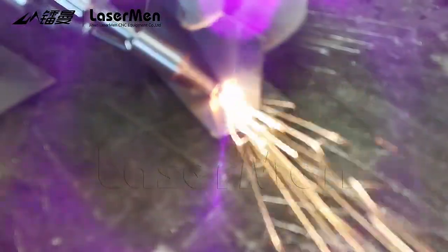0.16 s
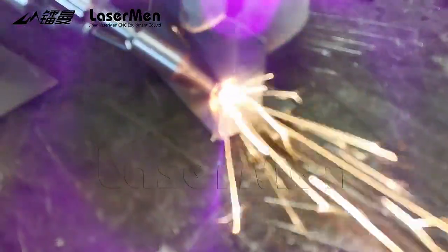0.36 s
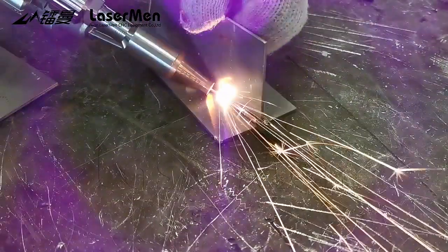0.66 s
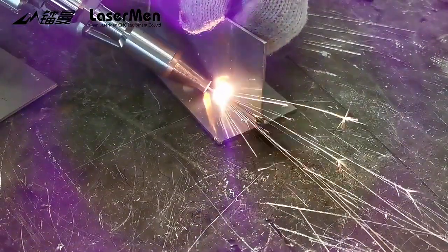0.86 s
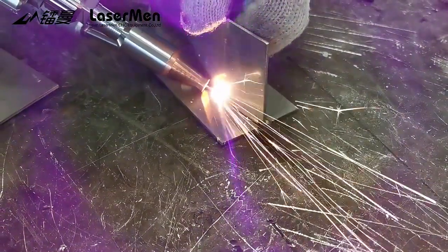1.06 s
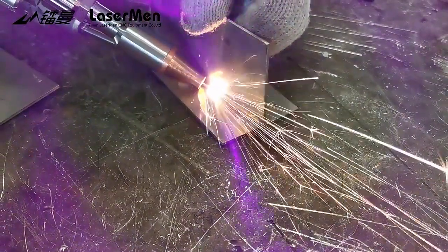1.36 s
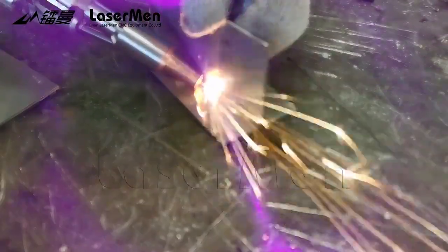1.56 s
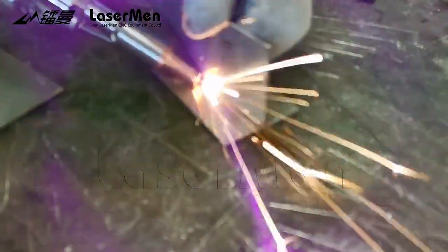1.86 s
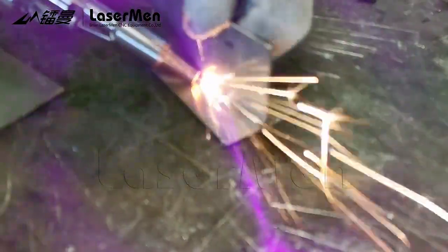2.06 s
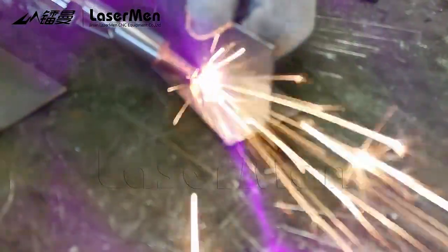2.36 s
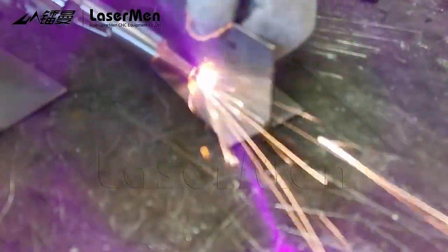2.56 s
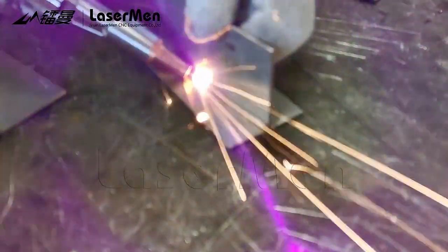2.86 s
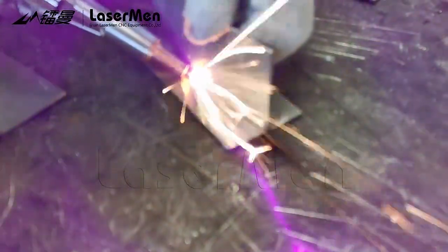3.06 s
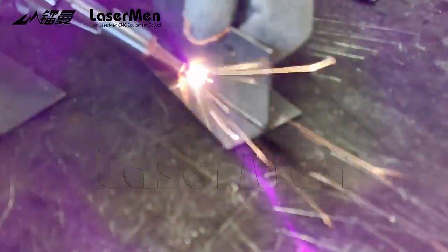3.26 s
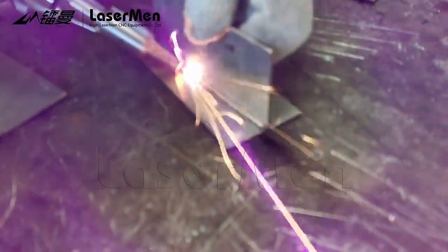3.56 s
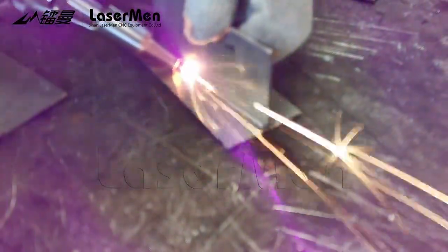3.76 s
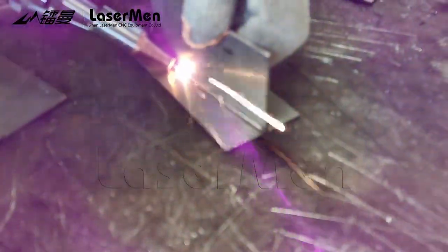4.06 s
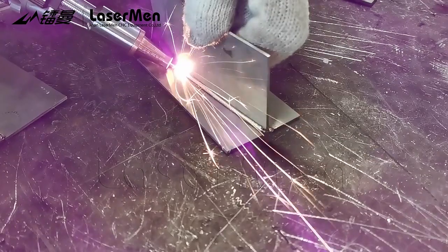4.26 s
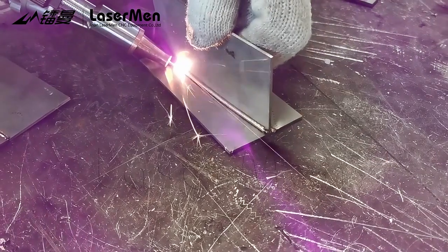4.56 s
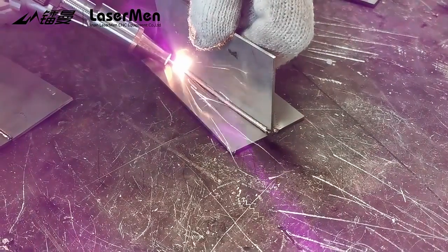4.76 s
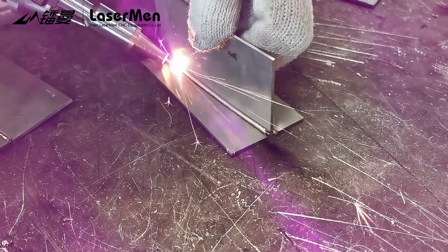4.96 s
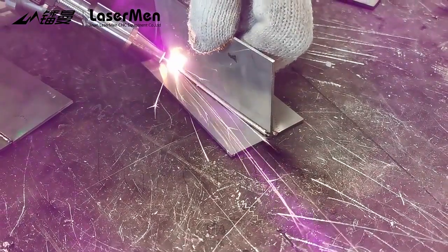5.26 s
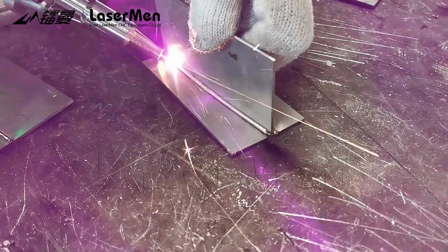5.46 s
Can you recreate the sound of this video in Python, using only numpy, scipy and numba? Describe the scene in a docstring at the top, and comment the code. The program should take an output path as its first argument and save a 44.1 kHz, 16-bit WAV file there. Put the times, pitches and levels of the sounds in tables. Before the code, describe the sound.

A steady, bright gas hiss with a thin high whistle and a fluttering low hum, as a handheld laser welder draws a seam on steel.

```python
"""A handheld laser welder draws a seam along a steel corner joint, close to a phone with two far-apart microphones.
From the start, filtered noise makes gas hiss, a corner roar and two whistles; sine waves make the beam's hum.
Behind them lie a noise rumble and a motor drone. Dull puffs come with some hum swells between 0.2 and 3.2 s.
At the right, the high whistle jumps up at 1.3 s, sinks near 3.7 s and returns; the low one ends higher.
The roar comes and goes throughout, and the deep rumble swells near 3.4 s and again near 5.4 s."""
import sys
import numpy as np
from scipy import signal
from scipy.fft import rfft, irfft
from scipy.io import wavfile
from scipy.ndimage import uniform_filter1d
from numba import njit

SR = 44100
rng = np.random.default_rng(int(sys.argv[2]) if len(sys.argv) > 2 else 0)


def materialize(psi):
    """Save the field psi as 16-bit PCM at rate SR to the path in sys.argv[1].

    A 1-D psi becomes a single channel; in a 2-D psi each row is a channel.
    """
    bounded = np.clip(np.atleast_2d(psi).T, -1, 1)
    quanta = np.round(bounded * 32767).astype(np.int16)
    wavfile.write(sys.argv[1], SR, quanta)


N = 248283  # samples, about 5.63 s

# Levels are relative wherever a whole layer is set to one strength afterwards.
# paths by which the left turbulence also reaches the right microphone, off plate and bench;
# a negative lag reaches the right first: (lag/ms, sway/ms, sway f/Hz)
ECHO_PATHS = [(-3.4, .5, .43), (-1.1, .4, .61), (.9, .45, .37), (2.6, .5, .53)]
# colour of the workshop fans and machines: (f/Hz, left relative level/dB, right relative level/dB)
SHOP_COLOUR = [(14, -2, -6), (32, -9, -1), (58, 5, 0), (76.6, -1, -2), (92, 3, -0.5), (106, -2.5, -3),
               (131, -1.5, -3), (237, 1, -5), (350, -4, -6.5), (470, -3.5, -15), (680, -2.5, -0.5),
               (870, -1, -8), (1030, -5, -6.5), (1240, -4.5, -4.5), (1380, -3, -4), (1857, -1, 1.5),
               (2180, -32, -23)]
# rise and fall of the deep rumble: (t/s, relative level/dB)
DEEP_RUMBLE_LEVEL = [(0.0, -2), (0.6, -1.5), (1.25, -1), (1.7, -5), (2.4, -2), (3.4, 5), (3.8, -2.5),
                     (4.6, 0.5), (5.2, -1), (5.4, 7), (5.63, -6)]
# brief dull puffs: (middle t/s, spread t/s, centre f/Hz, level/dB before the left-right balance)
PUFFS = [(0.182, 0.034, 400, -54), (0.4, 0.024, 180, -59), (1.48, 0.02, 497, -58), (2.52, 0.041, 348, -58),
         (3.23, 0.042, 350, -56)]
# beam hum between swells, before its wavering:
# (t/s, left level/dB of multiples 2, 3, 4, right level/dB of multiples 2, 3, 4)
HUM_LEVEL = [(0.0, -67, -63.5, -63, -63, -65, -72), (0.45, -70.5, -68, -61.5, -66, -71, -65),
             (0.8, -69, -65, -62.5, -68, -70, -75), (1.2, -63, -68, -74, -69, -80, -80),
             (1.6, -69.5, -74, -66, -76, -78, -68), (2.2, -59.5, -70, -77, -69, -73, -82),
             (2.9, -59.5, -72, -61.5, -72, -69, -86), (3.5, -69, -61.5, -76, -68, -69, -74),
             (4.1, -57.5, -68, -76, -64, -62, -77), (4.2, -62, -50, -72, -62, -57.5, -64),
             (5.0, -61, -61.5, -73, -71, -59.5, -76), (5.63, -58.5, -61, -76, -63, -63, -66)]
# brief swells of the hum: (middle t/s, spread t/s, peak change of level/dB at the left for multiples 2, 3, 4)
HUM_SWELLS = [(0.18, 0.075, 11, 14.5, -7), (0.43, 0.044, 17, -6, 3), (0.91, 0.018, -2, 4, 15),
              (1.5, 0.1, 8, 10, 4), (1.98, 0.023, 9, -3, -6), (2.52, 0.073, 4, 12, 3),
              (3.0, 0.037, 9, -7, 6), (3.25, 0.043, 13.5, 18.5, 7), (3.72, 0.03, 7, 13, -2),
              (4.17, 0.019, 3, 9, 15), (4.8, 0.037, 3, 8, -2), (5.12, 0.057, 11, 2, 12),
              (5.38, 0.024, -4, 10.5, 0)]
# weaker multiples of the wobble: (multiple, left level/dB, right level/dB, change of level/dB per s)
WEAK_MULTIPLES = [(1, -74, -81, -1), (5, -73, -82, -2), (6, -77, -78, -3), (7, -77, -72, -1),
                  (9, -84, -79, 0), (10, -80, -77, -1), (13, -82, -78, -1)]
# the two whistles: (left f/Hz, left level/dB, core width f/Hz, skirt width f/Hz,
# left skirt level/dB against the core, right skirt level/dB against the core)
WHISTLE_FORM = [(3785, -47.5, 90, 570, 3.5, -13), (6820, -45, 115, 660, 2, -6.5)]
# whistle pitch at the right, as the nozzle moves along the joint: (t/s, low whistle f/Hz, high whistle f/Hz)
RIGHT_PITCH = [(0.0, 3755, 6785), (1.26, 3745, 6790), (1.3, 3745, 6850), (2.45, 3760, 6880),
               (2.65, 3770, 6930), (3.7, 3795, 6945), (4.05, 3800, 6900), (4.6, 3815, 6920),
               (5.63, 3825, 6940)]
# whistles at the right: (t/s, low whistle level/dB, high whistle level/dB, level/dB of the shoulder below it)
RIGHT_LEVEL = [(0.0, -43.5, -38, -38.5), (0.7, -45, -35.5, -40), (1.24, -41.5, -39.5, -41.5),
               (1.3, -44, -34.5, -43), (1.45, -42, -36, -43), (2.45, -40.5, -36, -58),
               (2.65, -40.5, -40, -55), (3.7, -42, -45.5, -59), (4.05, -41.5, -39, -44),
               (4.6, -42.5, -36.5, -50), (5.63, -46, -39, -47)]
# resonances of the roar: (middle f/Hz, width f/Hz, relative level/dB, climb f/Hz per s)
ROAR_BANDS = [(1497, 93, -5, -9), (1604, 65, 0.5, 0.5), (1694, 48, -4, -17), (1830, 110, -2.5, -2)]
# strength of the roar in the corner of the joint: (t/s, level/dB)
ROAR_STRENGTH = [(0.0, -51), (0.3, -58.5), (0.7, -51.5), (1.2, -56.5), (1.98, -60.5), (2.08, -55),
                 (2.65, -56), (2.8, -50.5), (3.12, -60), (3.42, -52), (3.75, -63), (4.0, -50), (4.5, -61),
                 (4.65, -52.5), (5.05, -60), (5.3, -65), (5.63, -60)]
# colour of the broad jet noise: (f/Hz, left relative level/dB, right relative level/dB)
JET_COLOUR = [(1943, -15.5, -14.5), (2650, -6, -8), (3200, -6, -6), (4340, -0.5, 1), (4700, -1.5, -2),
              (5170, -1.5, 0.5), (6450, -2.5, -1), (7460, -3.5, 4), (7500, -1, -4), (7750, -2, 0),
              (8000, -5.5, -1), (8350, 1.5, -6), (9900, 1.5, -1), (11300, 2.5, -7.5), (12600, -2.5, -4),
              (13500, 2, 3), (14700, -4.5, -10), (16500, 6, -5)]
# nozzle and microphone-port resonances in the hiss, creeping as the nozzle moves: (middle f/Hz, width f/Hz,
# left relative level/dB, right relative level/dB, climb f/Hz per s, change of level/dB per s)
HISS_RINGS = [(2125, 190, -22.5, -28, 3, 0.5), (2360, 200, -28.5, -34, 9, -0.5),
              (2730, 180, -26.5, -25, -12, 0), (2928, 170, -34, -18, 22, 0.8),
              (3305, 240, -26.5, -18, -16, 2), (3516, 140, -31, -19, 0, -1.5),
              (4003, 110, -36, -19.5, 13, -1.8), (4794, 370, -16, -21, -7, 0),
              (5460, 740, -11.5, -17.5, 34, 0.1), (7100, 270, -30, -8.5, 31, -2),
              (8170, 280, -33, -29, 3, -7), (8700, 450, -3.5, -23, -12, -0.5), (8880, 500, 0, -19, 4, 0.5),
              (9510, 640, -1.5, -22, 13, -0.4), (10440, 1200, -10.5, -16, -2, 1.2),
              (10900, 450, -12, -19, -8, -2), (11560, 650, -16, -15, -2, 0.5),
              (11750, 1100, -8, -9, -4, -0.9), (12200, 410, -24, -18, -2, 2),
              (15400, 800, -20, -25, -2, -1)]

WOBBLE_HZ = 98.6  # rate of the beam wobble
TURBULENCE_SHARED, FLICKER_SHARED = .5, .6  # power in common, 0 to 1
DEEP_ALIKE, DEEP_ALIKE_HZ = .14, 397  # power in common at both microphones, below this pitch
RIGHT_SWING = .12  # share of each hum swell, in dB, heard at the right
FLUTTER_DB, FLUTTER_RAD, FLUTTER_PER_S = 3.4, .4, 45  # quick changes of the hum in level and phase
WHISTLE_FLAT, ROAR_FLAT = .85, .8  # how far apart the two filter stages are tuned, in widths
GAS_DB, JET_DB = -36.5, -1  # the whole hiss, and the jet within it


def undb(db):
    """Turn decibels into a plain multiplier."""
    return 10 ** (np.asarray(db) / 20)


def unit(x):
    """Scale a sound to an average strength (RMS) of 1."""
    return x / np.sqrt(np.mean(x ** 2))


def played(table):
    """Draw each column of a curve table over time, one value a sample."""
    s, *columns = np.transpose(table)
    return [np.interp(np.arange(N) / SR, s, column) for column in columns]


def drift(per_s):
    """A steady change, zero at the middle of the seam."""
    return per_s * (np.arange(N) - N / 2) / SR


def split(x, hz):
    """Part a sound into what lies below and above a pitch."""
    low = signal.filtfilt(*signal.butter(2, hz, fs=SR), x)
    return low, x - low


def walk(rate):
    """Random levels, held 1 / rate seconds and smoothed twice; their RMS is 1."""
    hold = int(SR / rate)
    steps = np.repeat(rng.standard_normal(N // hold + 1), hold)
    smooth = uniform_filter1d(uniform_filter1d(steps, hold), hold)
    return unit(smooth[:N])


def flicker(db, rate):
    """Quick random loudness changes at both microphones, partly the same."""
    both = np.sqrt(FLICKER_SHARED) * walk(rate)
    walks = np.array([both + np.sqrt(1 - FLICKER_SHARED) * walk(rate) for _ in range(2)])
    # the slow part is taken out: the tables play the slow swells
    slow = uniform_filter1d(walks, int(6 * SR / rate))
    return undb(db * unit(walks - slow))


def turbulence():
    """Two noises; the right one is partly the left one, by paths that drift as the hand moves."""
    left, own = rng.standard_normal((2, N))
    n = np.arange(N)
    echo = 0
    for lag_ms, sway_ms, sway_hz in ECHO_PATHS:
        delay_ms = lag_ms + sway_ms * np.sin(2 * np.pi * sway_hz * n / SR)
        echo = echo + np.interp(n - SR / 1000 * delay_ms, n, left)
    right = np.sqrt(1 - TURBULENCE_SHARED) * own + np.sqrt(TURBULENCE_SHARED) * unit(echo)
    return np.array([left, right])


@njit
def svf(x, hz, width):
    """Resonance that passes a band (state-variable filter); its centre may move every sample."""
    y, band, low = np.empty(len(x)), 0., 0.
    for i in range(len(x)):
        g, damping = np.tan(np.pi * hz[i] / SR), width / hz[i]
        v = (band + g * (x[i] - low)) / (1 + g * (g + damping))
        band, low, y[i] = 2 * v - band, low + 2 * g * v, damping * v
    return y


def ring(hz, width, flicker_db, rate, flat=0):
    """Turbulence rings a cavity: two filter stages in a row, tuned apart to flatten the top."""
    centres, width = hz * np.ones((2, N)), float(width)
    offset = flat * width / 2
    tones = []
    for noise, centre in zip(turbulence(), centres):
        first = svf(noise, centre - offset, width)
        tones.append(unit(svf(first, centre + offset, width)))
    return flicker(flicker_db, rate) * tones


def bands(noise, table, flicker_db, rate):
    """Two-channel noise coloured by a table; each quarter-octave band flickers alone."""
    hz, *colour = np.transpose(table)
    log_f = np.log2(np.maximum(np.fft.rfftfreq(N, 1 / SR), 1))
    curves = [np.interp(log_f, np.log2(hz), c, left=-99, right=-99) for c in colour]
    spectrum = rfft(noise) * undb(curves)
    out = 0
    for centre in np.arange(np.log2(hz[0]), np.log2(hz[-1]) + 1 / 4, 1 / 4):
        share = np.clip(1 - 4 * abs(log_f - centre), 0, 1)  # neighbouring bands overlap
        out = out + irfft(spectrum * share, N) * flicker(flicker_db, rate)
    return unit(out)


def shop():
    """Fans and machines: coloured noise and a motor drone; only the bass is partly alike on both sides."""
    deep, high = split(rng.standard_normal((3, N)), DEEP_ALIKE_HZ)
    noise = high[:2] + np.sqrt(1 - DEEP_ALIKE) * deep[:2] + np.sqrt(DEEP_ALIKE) * deep[2]
    deep, mid = split(bands(noise, SHOP_COLOUR, 2.67, 16), 120)
    # the middle of the rumble recedes by 0.48 dB per s
    rumble = deep * undb(played(DEEP_RUMBLE_LEVEL)) + mid * undb(drift(-.48))
    motor = np.sin(2 * np.pi * 59.8 * np.arange(N) / SR)
    drone = undb([[-82], [-72]]) * flicker(4.5, 9) * motor
    return undb(-53) * rumble + drone


def surges():
    """Short puffs of dull noise, shaped by a broad resonance and mostly on the left."""
    out, t = 0, np.arange(N) / SR
    for s, spread, hz, db in PUFFS:
        puff = unit(svf(rng.standard_normal(N), np.full(N, float(hz)), 1.3 * hz))
        swell = np.exp(-.5 * ((t - s) / spread) ** 2)
        out = out + undb(db) * swell * puff
    return out * undb([[3], [-4]])


def wobble():
    """The beam sweeps the melt pool at a fixed rate: a fluttering hum of multiples that come and go."""
    t = np.arange(N) / SR
    turn = 2 * np.pi * WOBBLE_HZ * t + .082 * walk(13)
    rises = sum(np.outer(db, np.exp(-.5 * ((t - s) / spread) ** 2)) for s, spread, *db in HUM_SWELLS)
    hum = 0
    levels = played(HUM_LEVEL)
    for k, left_db, right_db, rise in zip((2, 3, 4), levels[:3], levels[3:], rises):
        gain = undb([left_db + rise, right_db + RIGHT_SWING * rise])
        waver = flicker(4.5 / k, 10) * flicker(FLUTTER_DB, FLUTTER_PER_S)  # low multiples waver more
        right_lead = [[0], [1.1]] + [[0], [.6]] * walk(3.73)  # radians
        phase = k * turn + FLUTTER_RAD * walk(FLUTTER_PER_S) + right_lead
        hum = hum + gain * waver * np.sin(phase)
    for k, left_db, right_db, change in WEAK_MULTIPLES:
        gain = undb([[left_db], [right_db]] + drift(change)) * flicker(2.5, 8)
        hum += gain * np.sin(k * turn + rng.uniform(0, 2 * np.pi, (2, 1)))
    return hum


def whistles():
    """Gas whistles in two narrow resonances on wider skirts; both sides flutter, only the right glides."""
    out = 0
    *levels, shoulder_db = played(RIGHT_LEVEL)
    for right_hz, right_db, form in zip(played(RIGHT_PITCH), levels, WHISTLE_FORM):
        left_hz, left_db, core_width, skirt_width, *skirt_db = form
        hz = np.array([np.full(N, left_hz), right_hz]) + 7 * walk(25)  # flutter of 7 Hz RMS
        core = ring(hz, core_width, 1.07, 45, WHISTLE_FLAT)
        skirt = undb(skirt_db)[:, None] * ring(hz, skirt_width, 1.8, 35)
        tone = [unit(x) for x in core + skirt]
        out = out + tone * undb([np.full(N, left_db), right_db])
    # a shoulder below the high whistle, at the right only
    out[1] += ring(6570, 120, .48, 30.5, WHISTLE_FLAT)[1] * undb(shoulder_db)
    return out


def corner_roar():
    """Turbulence roars in the corner of the joint: close resonances that each come and go."""
    roar = 0
    for hz, width, db, climb in ROAR_BANDS:
        sway = undb(db + 2.6 * walk(10))
        roar = roar + sway * ring(hz + drift(climb), width, 2.3, 40, ROAR_FLAT)
    return unit(roar) * undb(played(ROAR_STRENGTH))


def gas():
    """Shielding gas leaves the nozzle: jet noise and ringing cavities, pulsed a little by the beam wobble."""
    hiss = undb(JET_DB) * bands(turbulence(), JET_COLOUR, 1.75, 36)
    for hz, width, left_db, right_db, climb, change in HISS_RINGS:
        gain = undb([[left_db], [right_db]] + drift(change))
        hiss += gain * ring(hz + drift(climb), width, .66, 36)
    # the lower part fades by 0.17 dB per s against the bright part as the nozzle turns
    rest, top = split(hiss, 11700)
    body, bright = split(rest, 9600)
    hiss = body * undb(drift(-.17)) + bright + top
    hiss *= undb(.4 * walk(45))  # the whole stream flutters a little
    hiss *= 1 + .018 * np.sin(2 * np.pi * WOBBLE_HZ * np.arange(N) / SR)
    return hiss * undb(GAS_DB)


def scene():
    """Add the layers, from the background to the gas."""
    return shop() + surges() + wobble() + whistles() + corner_roar() + gas()


def record(dry):
    """The phone cuts the top: a steep low-pass filter at 15460 Hz."""
    return signal.sosfilt(signal.ellip(12, .2, 70, 15460, fs=SR, output="sos"), dry)


dry = scene()
out = record(dry)
materialize(out)
```